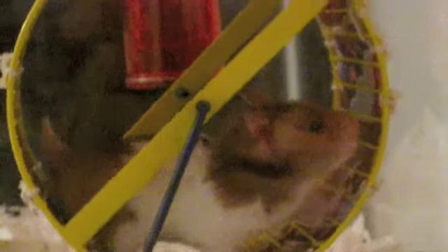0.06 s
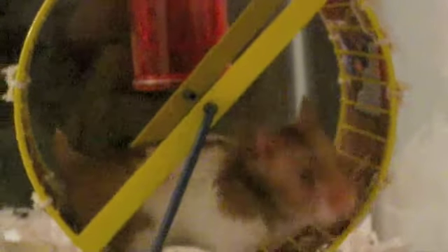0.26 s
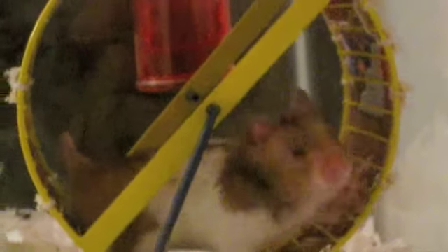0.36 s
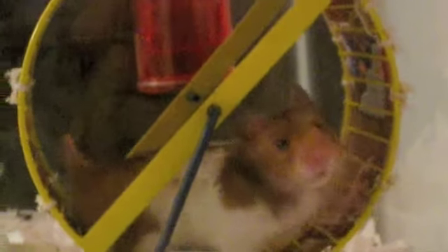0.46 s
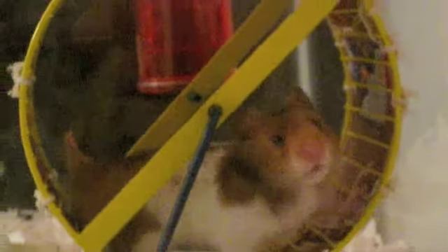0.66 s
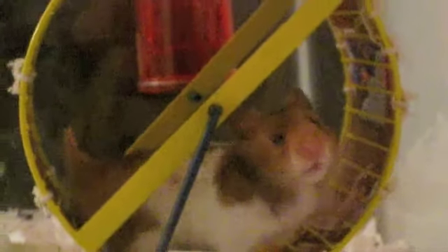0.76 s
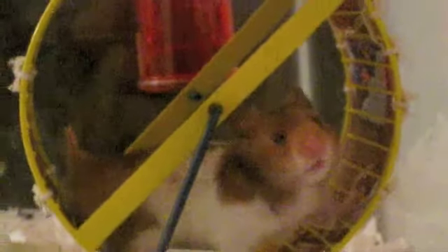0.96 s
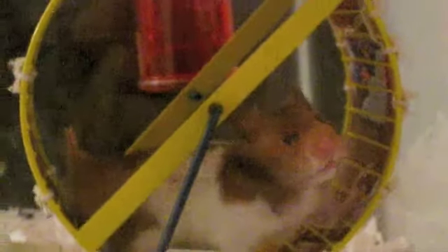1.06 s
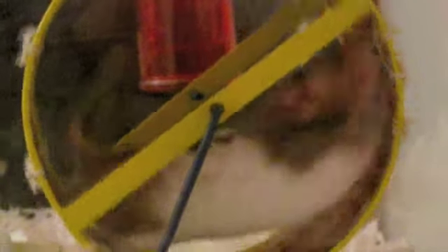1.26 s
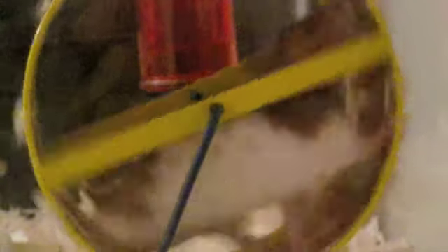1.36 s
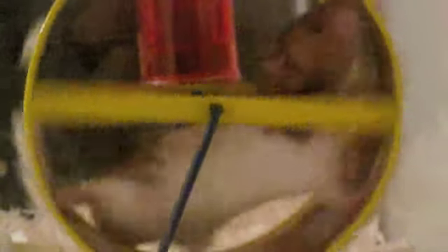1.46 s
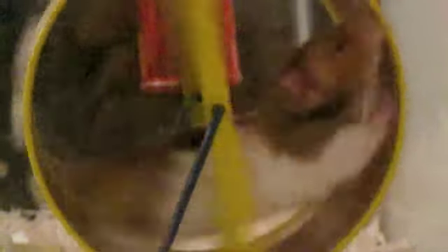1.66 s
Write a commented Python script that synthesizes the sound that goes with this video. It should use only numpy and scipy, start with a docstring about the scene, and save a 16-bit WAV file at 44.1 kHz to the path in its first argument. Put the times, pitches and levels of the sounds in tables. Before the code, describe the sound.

One sharp, dry knock on plastic sounds close up as a hamster shifts in its wheel. Soft low bumps follow, then faint claw ticks and rustling on the rungs, in a quiet room with an electrical hum.

```python
"""One sharp, dry knock on plastic, close up, then a soft second touch, as a hamster shifts in its wheel.
Its weight rocks the cage in dull bumps; as the wheel starts to turn, claws tick and scratch faintly
on the rungs over a fine rustle. Behind it sits a quiet room with mains hum and a thin electrical whine.
The recorder's gain ducks on the knock and creeps back."""
import sys
import numpy as np
from scipy import signal
from scipy.fft import rfft, irfft
from scipy.io import wavfile

SR = 44100
rng = np.random.default_rng(int(sys.argv[2]) if len(sys.argv) > 2 else 0)


def dump_mix(stems):
    """Bounce the given channels to the path in sys.argv[1] as a 16-bit WAV at rate SR."""
    frames = np.atleast_2d(stems).T  # one column per channel
    limited = np.clip(frames, -1, 1)  # hard clip at full scale
    pcm = np.round(limited * 32767).astype(np.int16)
    wavfile.write(sys.argv[1], SR, pcm)


N = 74970
TIME = np.arange(N) / SR


# the knock and the soft touch: start_s, strength_db, brightness_hz, top_hz
KNOCK_HITS = [(0.2079, -0.5, 2060, 9200), (0.2546, -12.5, 756, 1650)]
# resonances of the knocked plastic: pitch_hz, gain_db, t60_s
PLASTIC_MODES = [(388, -37.5, 0.021), (627, -22, 0.019), (877, -23.5, 0.021), (1144, -11.5, 0.01),
                 (1870, -3.5, 0.0044), (2340, -15, 0.011), (2585, -14, 0.014), (3660, -10, 0.008),
                 (4430, -20, 0.0086), (6580, -3, 0.0019), (8750, -3, 0.0022)]

def knocks():
    """Single hits on well-damped plastic; the softer the contact, the duller the tone."""
    force = np.zeros(N)
    for start_s, strength_db, brightness_hz, top_hz in KNOCK_HITS:
        contact = cut(click(start_s, strength_db), brightness_hz, "low")
        force += cut(contact, top_hz, "low", order=8)
    body = sum(from_db(gain_db) * ring(force, hz, t60_s) for hz, gain_db, t60_s in PLASTIC_MODES)
    return cut(body, hz=194, kind="high")


# claws landing on the rungs: start_s, level_db, brightness_hz
CLAW_STEPS = [(1.3628, -42.5, 8000), (1.407, -51, 5500), (1.4305, -50.5, 5500), (1.507, -46, 1700),
              (1.6133, -44.5, 3600), (1.6204, -46, 1630), (1.6314, -51, 1600), (1.6955, -44.5, 2100)]

def claws():
    """Each step snaps against the wheel and trails off in a brief scratch."""
    snap_gain, decay_s = 1.3, 0.004
    tick_gain = np.sqrt(decay_s * SR / N)  # unit rms over one decay time
    ticks = np.zeros(N)
    for start_s, level_db, brightness_hz in CLAW_STEPS:
        tail = (TIME > start_s) * np.exp(-np.abs(TIME - start_s) / decay_s)
        force = snap_gain * click(start_s, 0) + slips(per_s=4000) * tail
        ticks += from_db(level_db) * tick_gain * wheel(force, brightness_hz)
    return ticks


# resonances of the wheel: pitch_hz, relative_db, t60_s
WHEEL_RESONANCES = [(268, -4, 0.019), (1000, -4.5, .012), (1364, 1, 0.011), (1747, -6, 0.03),
                    (2200, -5, 0.014), (3240, -7.5, 0.015), (3810, 1, 0.014), (4460, -4, .011),
                    (5230, 0.5, 0.0056), (5900, -8.5, 0.018), (6600, -1, 0.0082)]

def wheel(force, brightness_hz):
    """The wheel rings under the claws, at unit rms; a softer contact gives less treble."""
    body = sum((-1) ** k * from_db(relative_db) * ring(force, hz, t60_s)
               for k, (hz, relative_db, t60_s) in enumerate(WHEEL_RESONANCES))
    softened = cut(body, brightness_hz, "low")
    return rms_one(cut(softened, hz=8000, kind="low", order=4))


# envelope of the rustle underfoot: time_s, level_db, brightness_hz
RUSTLE_ENVELOPE = [(0, -63, 2200), (.4, -67, 1500), (1.15, -60, 1900), (1.35, -61, 1900), (1.38, -55, 5500),
                   (1.44, -56.5, 5000), (1.48, -60.5, 2200), (1.7, -57.5, 1900)]

def rustle():
    """Dense, faint slips swell as the wheel starts to turn and brighten while the claws drag."""
    force = slips(per_s=2000)
    time_s, level_db, brightness_hz = np.transpose(RUSTLE_ENVELOPE)
    crossfades = [np.interp(TIME, time_s, weights) for weights in np.eye(len(time_s))]
    texture = sum(fade * wheel(force, hz) for fade, hz in zip(crossfades, brightness_hz))
    return from_db(np.interp(TIME, time_s, level_db)) * texture


# the hamster shifting its weight: start_s, strength_db
WEIGHT_SHIFTS = [(0.545, -31), (0.583, -50), (0.64, -40), (0.957, -39), (1.198, -44)]

def bumps():
    """Soft pushes rock the cage at its low resonance."""
    pushes = sum(click(start_s, strength_db) for start_s, strength_db in WEIGHT_SHIFTS)
    return ring(cut(pushes, hz=70, kind="low"), hz=55.4, t60_s=0.3)


# EQ curve of the room tone: frequency_hz, relative_db
ROOM_EQ = [(20, -69), (35, -70.5), (62, -64.5), (92, -73), (135, -73.5), (172, -77), (225, -70),
           (340, -74.5), (520, -82.5), (1000, -85), (1500, -91), (2300, -96), (3400, -96), (6500, -102.5),
           (10000, -107), (13000, -111), (15500, -112)]
# narrow bands of hiss and the electrical whine: pitch_hz, half_width_hz, level_db
WHINE_BANDS = [(1933, 120, -67), (2780, 300, -64.5), (4586, 120, -72), (7694, 62, -66.5), (7700, 180, -71)]
# mains hum and a faint high whistle: pitch_hz, level_db
HUM_TONES = [(59.8, -59.5), (119.5, -51), (244, -61.5), (15734, -92)]

def room():
    """A steady bed of rumble and hiss, with narrow whines and mains hum."""
    eq_hz, eq_db = np.transpose(ROOM_EQ)
    air = from_db(-45) * noise(lambda f: from_db(np.interp(np.log(f), np.log(eq_hz), eq_db)))
    whine = sum(from_db(level_db) * noise(lambda f: 1 / (1 + ((f - hz) / half_width_hz) ** 2))
                for hz, half_width_hz, level_db in WHINE_BANDS)
    hum = sum(from_db(level_db) * np.sqrt(2) * np.sin(2 * np.pi * (hz * TIME + rng.random()))
              for hz, level_db in HUM_TONES)
    return air + whine + hum


def slips(per_s):
    """Tiny random slips of claws on plastic."""
    return rng.choice([-1, 1], N) * (rng.random(N) < per_s / SR)


def click(start_s, level_db):
    """One impulse at a given time."""
    return from_db(level_db) * (np.arange(N) == int(start_s * SR))


def ring(force, hz, t60_s):
    """One resonance: a unit click starts a dying cosine of height 1."""
    decay = np.exp(-np.log(1000) / (t60_s * SR))
    feedback = decay * np.cos(2 * np.pi * hz / SR)
    return signal.lfilter([1, -feedback], [1, -2 * feedback, decay ** 2], force + 1e-18)


def noise(gain_at):
    """Steady noise of unit rms, coloured by a gain that depends on frequency."""
    hz = np.maximum(np.arange(N // 2 + 1) * SR / N, 1)
    return rms_one(irfft(rfft(rng.standard_normal(N)) * gain_at(hz), N))


def cut(x, hz, kind, order=2):
    """Low- or high-pass filter."""
    return signal.sosfilt(signal.butter(order, min(hz, .45 * SR), kind, fs=SR, output="sos"), x + 1e-18)


def from_db(db):
    """Decibels to gain."""
    return 10 ** (np.asarray(db) / 20)


def rms_one(x):
    """Scale to unit rms."""
    return x / np.sqrt(np.mean(x ** 2) + 1e-20)


def scene():
    """The room and the hamster, mixed in mono."""
    return (room() + knocks() + bumps() + rustle() + claws())[None]


def record(dry):
    """The recorder's gain ducks after a loud peak and recovers slowly; a steep low-pass trims the top."""
    threshold_db, duck_share, attack_s, release_db_per_s = -14.5, 0.18, 0.012, 5
    top_hz = 15800
    over_db = np.maximum(20 * np.log10(np.abs(dry[0]) + 1e-9) - threshold_db, 0)
    release_db = release_db_per_s * TIME
    duck_db = np.maximum.accumulate(duck_share * over_db + release_db) - release_db
    lag = np.exp(-1 / (attack_s * SR))
    gain = from_db(-signal.lfilter([1 - lag], [1, -lag], duck_db))
    return signal.sosfilt(signal.ellip(12, .1, 70, top_hz, fs=SR, output="sos"), dry * gain)


dry = scene()
out = record(dry)
dump_mix(out)
```